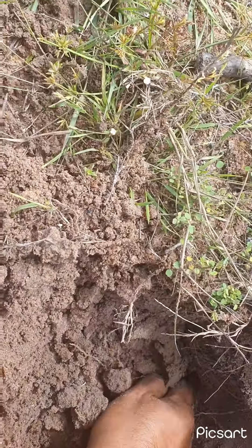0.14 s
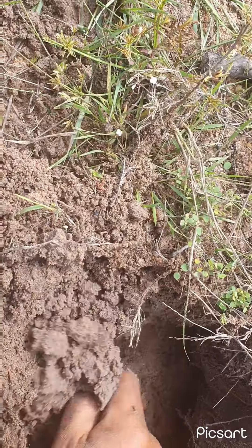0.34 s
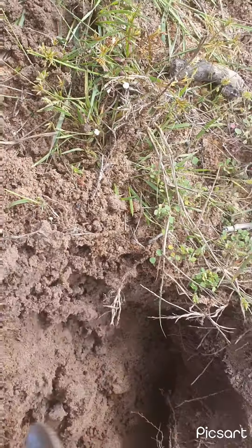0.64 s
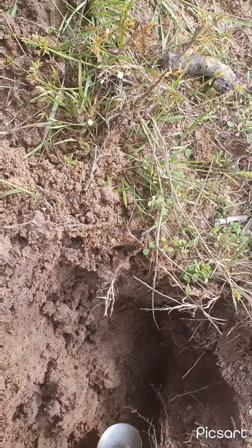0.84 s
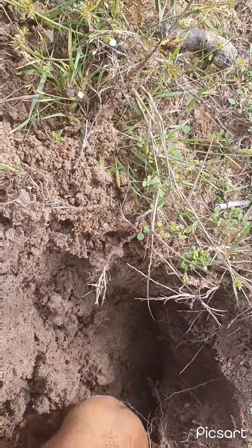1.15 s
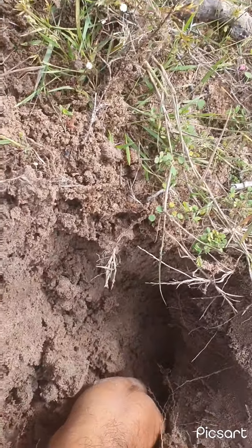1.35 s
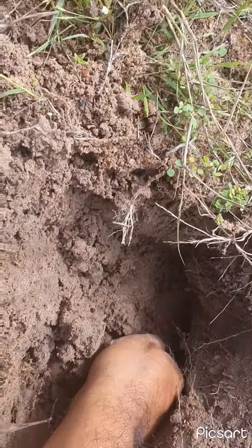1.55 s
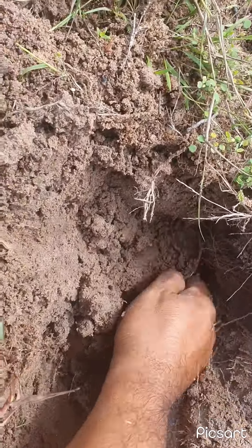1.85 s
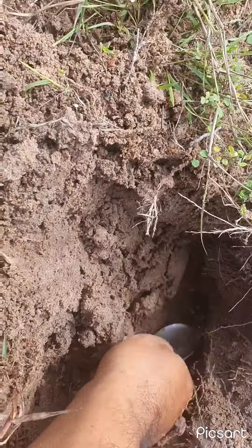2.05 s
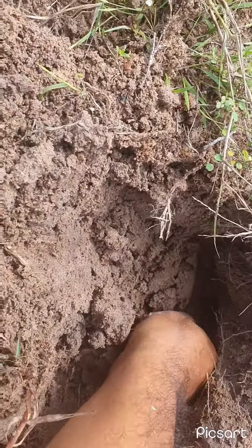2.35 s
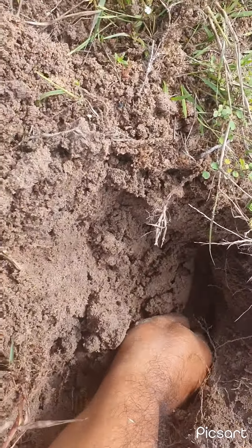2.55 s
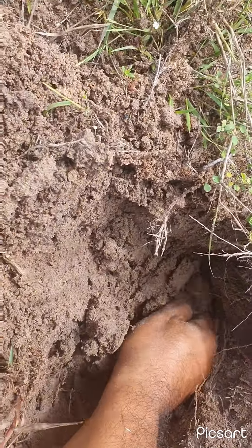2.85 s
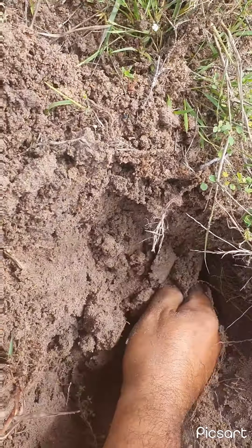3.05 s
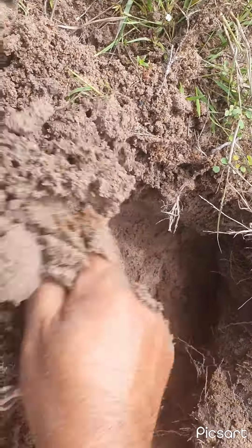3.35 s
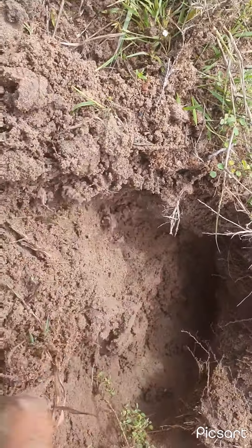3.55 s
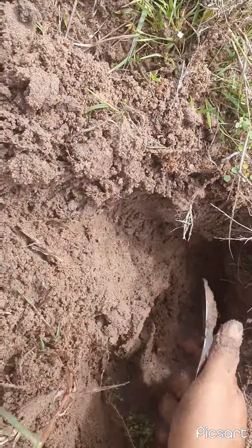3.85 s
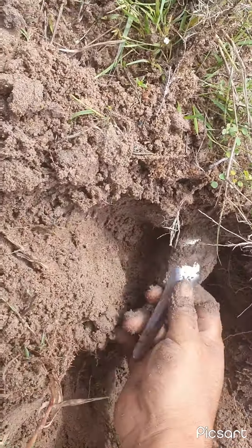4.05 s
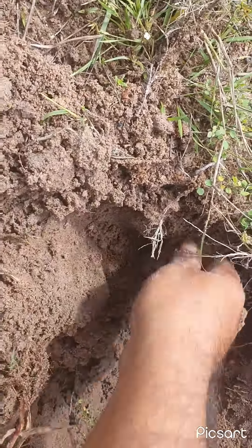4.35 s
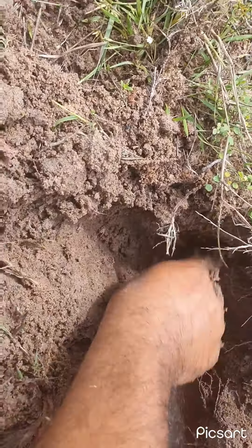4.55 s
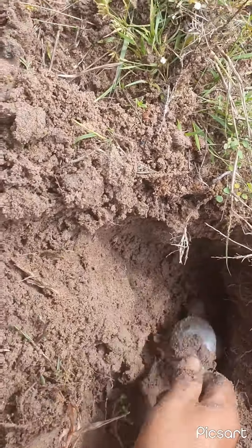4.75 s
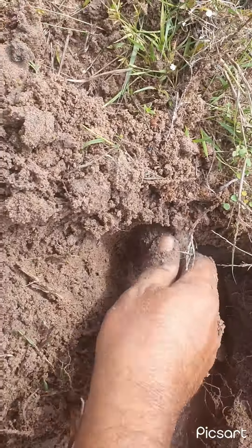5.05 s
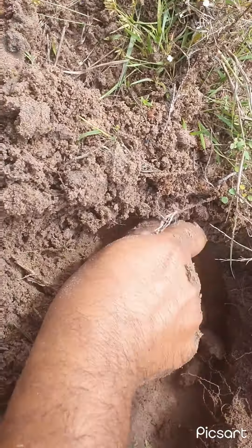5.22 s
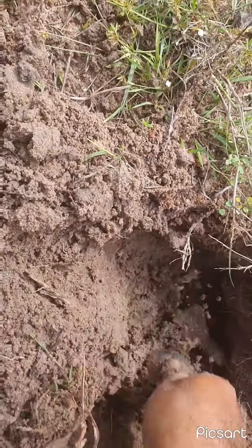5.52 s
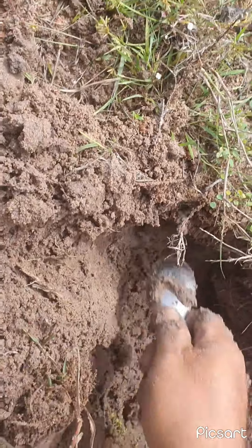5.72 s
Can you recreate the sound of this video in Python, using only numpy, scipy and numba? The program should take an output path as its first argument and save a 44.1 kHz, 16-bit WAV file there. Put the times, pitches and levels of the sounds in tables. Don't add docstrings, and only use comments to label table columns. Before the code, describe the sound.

Close, crunchy digging in loose dry earth: bursts of hand raking, dragging and spoon scooping, split by quiet pauses with tiny pebble ticks.

```python
import sys
import numpy as np
from scipy import signal
from scipy.fft import rfft, irfft
from scipy.io import wavfile
from scipy.ndimage import uniform_filter1d, map_coordinates
from numba import njit

SR = 44100
rng = np.random.default_rng(int(sys.argv[2]) if len(sys.argv) > 2 else 0)


def voltage_ratio(level):
    return 10 ** (np.asarray(level, float) / 20)


def store_pcm(level_fs):
    pcm = np.round(np.clip(level_fs, -1, 1) * 32767).astype(np.int16)
    wavfile.write(sys.argv[1], SR, np.atleast_2d(pcm).T)


N = 259308

# (start [s], length [s], effort [dB], swell over stroke [dB], soil fineness [dB])
RAKES = [(0, 0.056, -40, -3, -0.5), (.056, 0.023, -34.5, 1, 4.5), (.11, 0.032, -38, 1, -3),
         (.15, 0.13, -47, 8.5, -4.5), (.30, 0.23, -46, -4.5, -3.5), (.51, 0.045, -52.5, -16, 0.1),
         (1.074, .058, -49.5, 11.5, 3), (1.132, .068, -43.5, 2, 1), (1.20, 0.22, -39, -7.5, 1.5),
         (1.447, 0.027, -40, -5.5, -0.7), (1.49, 0.099, -54, -10, -1), (1.58, 0.057, -44.5, 5.5, -0.2),
         (1.78, 0.057, -44, 16, 1.5), (1.85, 0.029, -32.5, -3, -7), (1.89, 0.13, -56, -15.5, -1.3)]
# (start [s], length [s], effort [dB], swell [dB], soil fineness [dB])
LATER_RAKES = [(2.174, .152, -40.5, 14.5, 4), (2.327, 0.17, -37.5, -5.5, -2), (2.524, 0.091, -44.5, 4, -3),
               (2.626, 0.027, -37.5, -1, -0.5), (2.656, 0.14, -47, -5.5, -4), (2.77, 0.09, -45, 1.5, 5),
               (2.862, .03, -38.5, -5.5, -2), (2.882, .21, -44.5, -7, -1), (3.097, .15, -43, 13, 1.5),
               (3.248, 0.1, -42.5, -5.5, 5), (3.356, 0.077, -39, 1, -6.5)]
# (start [s], length [s], effort [dB], swell [dB], soil fineness [dB])
SCOOPS = [(4.043, 0.046, -57, -5, 5), (4.167, 0.0796, -45, 17, 3.5), (4.246, 0.1, -39, 11, 4.5),
          (4.355, 0.13, -32, 2, 2), (4.48, .095, -36.5, -2, -9), (4.577, 0.033, -45, 2, -3.5),
          (4.995, .055, -33.5, 2.5, 0.5), (5.041, 0.055, -28.5, 2, 3), (5.104, 0.073, -38, -19.5, -5),
          (5.154, .15, -37.5, 3, 0), (5.303, 0.084, -42, -4.5, -2.2), (5.406, 0.0676, -55.5, 12, -5),
          (5.5, 0.011, -38, 5, 0.5), (5.523, .02, -57.5, 2, -15), (5.548, 0.011, -54.5, 0, 11)]
# (start [s], length [s], level [dB])
TRICKLES = [(0.547, 0.063, -65), (.61, .11, -79), (0.717, 0.035, -57.5), (.77, .14, -73),
            (0.903, 0.042, -66), (.96, .11, -80), (1.645, .135, -63), (1.98, 0.055, -79),
            (2.053, 0.0087, -51.5), (2.108, 0.015, -57), (3.444, 0.046, -60), (3.523, 0.01, -58.5),
            (3.564, .11, -78.5), (3.644, 0.017, -63), (3.69, .025, -65), (3.73, 0.15, -75),
            (3.876, 0.034, -69.5), (3.933, .1, -82), (4.075, .07, -67.5), (4.628, 0.036, -60.5),
            (4.694, 0.057, -72), (4.86, 0.011, -82), (4.962, .035, -66), (5.58, .05, -67),
            (5.627, 0.067, -65.5), (5.843, 0.023, -69.5)]
# (time [s], level [dB])
DEPTH = [(0, 1), (.3, -12), (.55, -2.5), (1.3, -11.5), (1.5, -2.5), (1.9, 0), (2.3, -7.5), (2.55, -4),
         (2.8, 3.5), (3.25, -6), (3.96, -11), (4.06, 6), (4.3, 4), (4.5, -9), (4.62, 8.5), (5.05, -10.5),
         (5.33, 1), (5.5, -17)]
# (time [s], bowl [Hz], grit [Hz])
RINGS = [(0.0, 1810, 4860), (0.2, 1680, 3800), (0.26, 2480, 4170), (0.5, 1830, 4100), (1.11, 2540, 5050),
         (1.37, 2140, 4860), (1.49, 2000, 4440), (1.87, 2130, 4000), (2.4, 2300, 4620), (2.7, 1900, 3100),
         (3.26, 1720, 2780), (3.45, 2100, 3670), (4.3, 1900, 4670), (4.44, 2100, 4430), (4.62, 2210, 3900),
         (4.9, 2800, 3680), (5.38, 3440, 3670), (5.45, 1840, 4270)]
# (at usual effort [dB], per effort [dB/dB], per fineness [dB/dB])
HOLLOW_LAW = (0.2, -0.044, -0.14)
GRIT_LAW = (-1.35, -0.17, 0.6)
SAND_LAW = (-4, -0.41, 0.95)
# (frequency [Hz], density [dB per Hz])
SAND_SPECTRUM = [(6500, -22), (8000, -9), (10000, 1), (12000, 3), (14000, -0.5), (16000, -0.5)]
# (start [s], length [s], level [dB])
PALM = [(0, 0.005, -33.5), (.055, 0.064, -44), (.23, .22, -60), (.46, 0.09, -56), (2.23, 0.33, -63),
        (2.46, 0.04, -48), (2.6, 0.18, -65), (2.9, 0.12, -56.5), (3.2, 0.079, -39.5), (3.35, 0.062, -61),
        (4.04, 0.06, -55), (4.19, 0.4, -44), (4.69, 0.027, -53), (4.99, 0.13, -45), (5.13, 0.23, -47.5),
        (5.4, 0.22, -56.5)]
# (time [s], peak [dB], ring [Hz], t60 [s], sand spray [dB])
CLODS = [(0.014, -30, 580, 0.015, -18), (0.065, -16.5, 510, 0.022, -20), (0.084, -29, 1010, 0.024, -18),
         (0.117, -29.5, 1620, 0.048, -21), (1.452, -21, 1710, 0.0098, -22),
         (1.846, -17.5, 1240, 0.086, -12), (1.859, -12.5, 2220, 0.044, -53), (1.88, -9.5, 1910, 0.017, -12),
         (2.646, -23, 1080, 0.056, -5), (3.427, -34, 1610, 0.028, -21), (4.294, -36, 1820, 0.0066, -12),
         (4.574, -10, 2410, 0.011, -8.5), (4.604, -17.5, 1580, 0.017, -11.5),
         (5.002, -17.5, 2030, 0.022, -7), (5.503, -22.5, 1800, 0.056, -5)]
# (time [s], peak [dB], ring [Hz], t60 [s], sand spray [dB])
PEBBLES = [
    (0.74, -36.5, 3540, 0.024, -19),
    (1.07, -35, 5460, 0.022, -16),
    (2.048, -35.5, 4930, 0.048, 4),
    (2.06, -40.5, 565, 0.022, 10),
    (2.108, -47, 666, 0.072, -1),
    (2.167, -42, 2200, 0.02, 5),
    (3.533, -40, 3650, 0.022, -8),
    (3.656, -59, 2260, 0.025, -13),
    (3.704, -43, 4170, 0.013, -19),
    (4.700, -37.5, 890, 0.03, -15),
]
# (time [s], left port lag [ms], likeness of the grit at both ports [0-1])
PORT_LAG = [
    (0, 0.21, .65),
    (.55, 0.08, .55),
    (1.07, 0.105, .95),
    (1.44, 0.15, .95),
    (1.6, 0.1, .6),
    (2.3, 0.15, .7),
    (3.4, -0.07, .55),
    (4.0, -0.02, .7),
    (5.0, -0.02, .85),
    (5.88, -0.05, .7),
]
# (start [s], length [s], level [dB])
GUSTS = [(0, 0.26, -42), (.62, 0.31, -42.5), (1.15, 0.25, -43.5), (1.5, 0.03, -42), (1.66, 0.29, -45),
         (2.09, 0.065, -43.5), (2.25, 0.021, -44), (2.41, 0.025, -48.5), (2.64, 0.035, -42),
         (2.81, 0.12, -40), (3.05, 0.018, -40.5), (3.15, 0.45, -46.5), (3.48, 0.04, -40.5),
         (3.68, 0.055, -43.5), (3.82, 0.066, -44.5), (4.03, 0.072, -41.5), (4.28, 0.053, -38),
         (4.4, 0.015, -41.5), (4.47, 0.12, -46), (4.77, .19, -45), (5.03, 0.34, -43), (5.36, 0.19, -46),
         (5.56, 0.12, -44.5), (5.7, 0.17, -44)]
# (frequency [Hz], density [dB per Hz])
WIND_SPECTRUM = [(16, -46), (28, -13), (60, 0), (113, -4), (140, -10.5), (211, -11), (258, -16.5),
                 (286, -21), (435, -32), (549, -32.5), (900, -56), (1170, -91), (1980, -120)]
# (frequency [Hz], density [dB per Hz])
HISS_SPECTRUM = [(410, -7), (700, 2), (947, 4), (2600, 3.5), (3050, 1.5), (4520, 5.5), (7740, 0),
                 (11300, 1), (15100, 3), (16100, -5)]

USUAL_DB, REST_DB = -45, -104
BITE_DB_S, LET_GO_DB_S = 1118, 800
TRICKLE_FINENESS_DB = 4
HOLLOW_HZ, HOLLOW_OCTAVES_PER_DB = 947, 0.0667
BOWL_WIDTH_HZ, GRIT_WIDTH_HZ, RING_WANDER = 620, 1130, .03
COARSE_SCATTER_DB, FINE_SCATTER_DB, GRIT_FLICKER_DB = 1.1, .9, 1.6
THUD_ALIKE, RUB_ALIKE, SAND_ALIKE, WIND_ALIKE = .97, .9, .45, .6
SCRAPE_LEFT_DB, CLOD_LEFT_DB, GRIT_RIGHT_DB, SAND_RIGHT_DB = 3, 4, 1.2, 2.2
PRESS_DB_S, LIFT_DB_S = 277, 400
LULL_DB, GUST_DB_S, EDDY_DB = -49, 141, 2.2
HISS_DB = -59
DUCK_KNEE_DB, DUCK_SHARE, DUCK_MEMORY_S = -42, .3, .3
TOP_HZ = 16000


def scrape():
    trickles = [(*row, 0, TRICKLE_FINENESS_DB) for row in TRICKLES]
    effort_db, fineness_db = gestures(RAKES + LATER_RAKES + SCOOPS + trickles, BITE_DB_S, LET_GO_DB_S, REST_DB)
    over_db = effort_db - USUAL_DB

    def layer_db(law):
        usual_db, per_effort, per_fineness = law
        return usual_db + per_effort * over_db + per_fineness * fineness_db

    slip = walk(45)
    coarse = grains(1200, COARSE_SCATTER_DB, 0.012)
    fine = grains(3000, FINE_SCATTER_DB, 0.0031)
    thud = coarse * pair(THUD_ALIKE)
    rub = coarse * pair(RUB_ALIKE)
    rattle = (fine + 0.23 * coarse) * pair(follow(PORT_LAG)[1])

    hollow_hz = HOLLOW_HZ * 2 ** (HOLLOW_OCTAVES_PER_DB * over_db)
    bowl_hz, grit_hz = follow(RINGS)
    bowl_hz = bowl_hz * (1 + RING_WANDER * walk(27.1))
    grit_hz = grit_hz * (1 + RING_WANDER * walk(29))
    hollow = steep(thud, hollow_hz, 330) + voltage_ratio(0.5) * steep(thud, 796, 2170)
    bowl = steep(rub, bowl_hz, BOWL_WIDTH_HZ) + voltage_ratio(-6.5) * steep(rub, 2100, 2900)
    grit = steep(rattle, grit_hz, GRIT_WIDTH_HZ) + voltage_ratio(4.5) * steep(rattle, 3980, 4300)
    sand = colour(fine * pair(SAND_ALIKE), SAND_SPECTRUM) * lean_left(-SAND_RIGHT_DB)

    hollow_db = layer_db(HOLLOW_LAW) + follow(DEPTH)[0] + 0.5 + 1.2 * slip + 1.1 * walk(24.82)
    bowl_db = 2.5 + 0.76 * slip + 0.49 * walk(24.03)
    grit_db = layer_db(GRIT_LAW) + 2.5 + 0.59 * slip + GRIT_FLICKER_DB * walk(19)
    sand_db = layer_db(SAND_LAW) + 6.0 + 0.51 * slip + 0.86 * walk(21.8)
    out = unit(hollow) * voltage_ratio(hollow_db) + unit(bowl) * voltage_ratio(bowl_db)
    out = out + unit(grit) * voltage_ratio(grit_db) * lean_left(-GRIT_RIGHT_DB)
    out = out + unit(sand) * voltage_ratio(sand_db)
    return pockets(out) * voltage_ratio(effort_db - 3.5) * lean_left(SCRAPE_LEFT_DB)


def grains(rate_hz, scatter_db, length_s):
    sizes = voltage_ratio(scatter_db * np.minimum(rng.exponential(size=N), 5))
    hits = (rng.random(N) < rate_hz / SR) * sizes
    return signal.lfilter([1], [1, -np.exp(-1 / (length_s * SR))], hits)


def pockets(x, count=14):
    out = x
    for hz in np.geomspace(700, 13000, count):
        level_db = -7.0 + 4.8 * walk(11)
        moving_hz = hz * (1 + 0.063 * walk(3.036))
        out = out + voltage_ratio(level_db) * ring(x, moving_hz, 0.055 * hz)
    return out


def palm():
    shove = unit(steep(grains(500, 4.5, 0.0059) * pair(THUD_ALIKE), 309, 346))
    return shove * voltage_ratio(gestures(PALM, PRESS_DB_S, LIFT_DB_S, rest_db=-88)[0])


def clods():
    length = 4000
    out, t = np.zeros((2, N + length)), np.arange(length) / SR
    for start_s, peak_db, hz, t60_s, spray_db in sorted(CLODS + PEBBLES):
        noise = rng.standard_normal((3, length))
        onset = 1 - np.exp(-t / 0.00017)
        decay = np.exp(-np.log(1000) * t / max(t60_s, .003))
        crumble = (noise[0] + 0.55 * noise[1:]) * onset * decay
        body = steep(crumble, hz, 0.78 * hz)
        spray = ring(crumble, 8000, 6700)
        hit = body / np.abs(body).max() + voltage_ratio(spray_db) * spray / np.abs(spray).max()
        i = int(start_s * SR)
        out[:, i:i + length] += hit * voltage_ratio(peak_db) * lean_left(CLOD_LEFT_DB)
    return out[:, :N]


def wind():
    eddies = colour(pair(WIND_ALIKE) * voltage_ratio(EDDY_DB * walk(16)), WIND_SPECTRUM)
    return unit(eddies) * voltage_ratio(gestures(GUSTS, GUST_DB_S, GUST_DB_S, LULL_DB)[0] + 3.0)


def hiss():
    return unit(colour(pair(0.008), HISS_SPECTRUM)) * voltage_ratio(HISS_DB + 0.15 * walk(11))


def ducking(near):
    keep = np.exp(-1 / (DUCK_MEMORY_S * SR))
    recent = signal.lfilter([1 - keep], [1, -keep], np.mean(near ** 2, axis=0))
    return (1 + recent / voltage_ratio(2 * DUCK_KNEE_DB)) ** -DUCK_SHARE


def at_ports(x):
    lag_ms = follow(PORT_LAG)[0]
    return np.array([delay(x[0], lag_ms / 2), delay(x[1], -lag_ms / 2)])


def delay(x, ms):
    return map_coordinates(x, [np.arange(N) - ms * SR / 1000], order=3, mode="nearest")


def gestures(rows, rise_db_s, fall_db_s, rest_db):
    full_rows = np.array([(*row, 0, 0)[:5] for row in rows], float)
    start, length, db, swell_db, colour_db = full_rows.T[:, :, None]
    t = np.arange(0, N / SR, .002)
    held = db + swell_db * (np.clip((t - start) / length, 0, 1) - .5)
    before_s, after_s = np.maximum(start - t, 0), np.maximum(t - start - length, 0)
    each = held - rise_db_s * before_s - fall_db_s * after_s
    power = voltage_ratio(2 * each)
    mixed_db = (power * colour_db).sum(axis=0) / (power.sum(axis=0) + voltage_ratio(2 * rest_db))
    level_db = np.maximum(each.max(axis=0), rest_db)
    return follow(np.transpose([t, level_db, mixed_db]))


def follow(table):
    s, *columns = np.transpose(table)
    return [np.interp(np.arange(N) / SR, s, c) for c in columns]


def walk(rate_hz):
    k = int(SR / rate_hz)
    steps = np.repeat(rng.standard_normal(N // k + 1), k)
    return 1.3 * uniform_filter1d(uniform_filter1d(steps, k), k)[:N]


def pair(alike):
    mid, side = rng.standard_normal((2, N))
    c = np.clip(alike, 0, 1)
    return np.sqrt(1 + c) * mid + np.sqrt(1 - c) * side * np.array([[1], [-1]])


def lean_left(db):
    return voltage_ratio(db * np.array([[.5], [-.5]]))


def colour(x, table):
    hz, db = np.transpose(table)
    log_f = np.log(np.arange(N // 2 + 1) * SR / N + 1)
    return irfft(rfft(x) * voltage_ratio(np.interp(log_f, np.log(hz), db, -90, -90)), N)


def steep(x, hz, width_hz):
    return ring(ring(x, hz, width_hz), hz, width_hz)


def ring(x, hz, width_hz):
    return np.array([svf(c, hz * np.ones(len(c)), 1. * width_hz) for c in x])


@njit
def svf(x, hz, width_hz):
    y, band, low = np.empty(len(x)), 0., 0.
    for i in range(len(x)):
        g, k = np.tan(np.pi * hz[i] / SR), width_hz / hz[i]
        v = (band + g * (x[i] - low)) / (1 + g * (g + k))
        band, low, y[i] = 2 * v - band, low + 2 * g * v, k * v
    return y


def unit(x):
    return x / np.sqrt(np.mean(x ** 2))


def scene():
    near = at_ports(scrape() + palm() + clods())
    return near + wind() + hiss() * ducking(near)


def band_limit(x):
    return signal.sosfilt(signal.butter(12, 16290, fs=SR, output="sos"), x)


def record(dry):
    low_pass = signal.ellip(8, .2, 70, TOP_HZ, fs=SR, output="sos")
    mix = signal.sosfilt(low_pass, dry)
    return band_limit(mix)


dry = scene()
out = record(dry)
store_pcm(out)
```